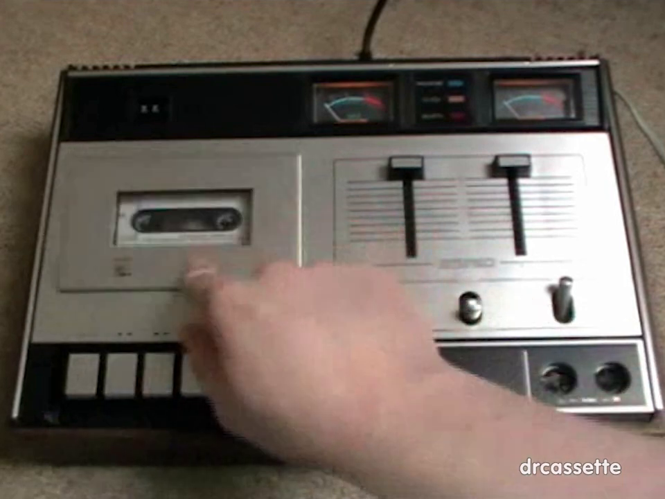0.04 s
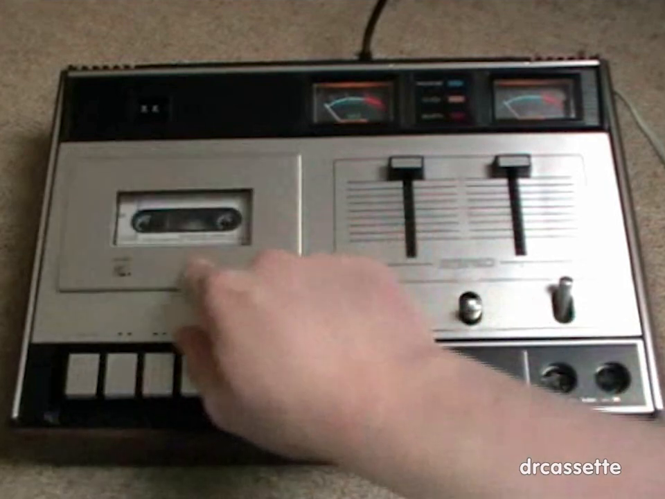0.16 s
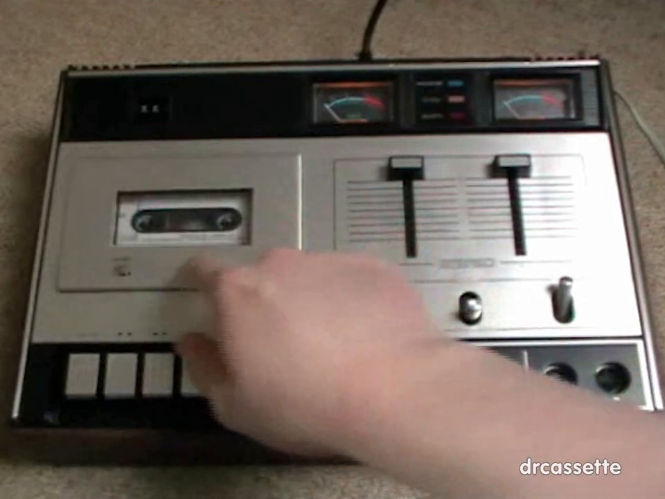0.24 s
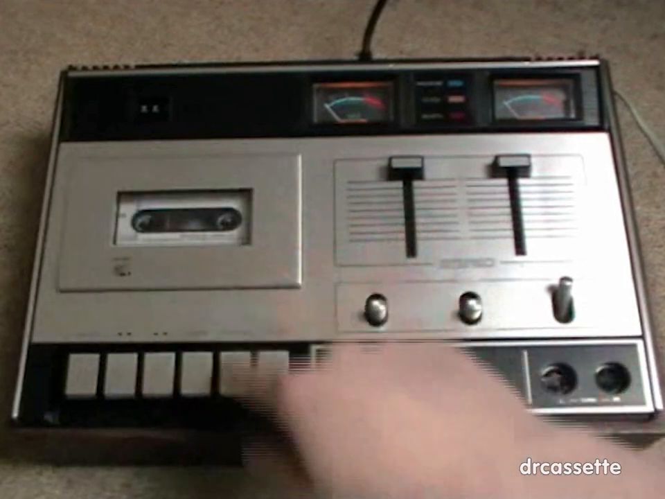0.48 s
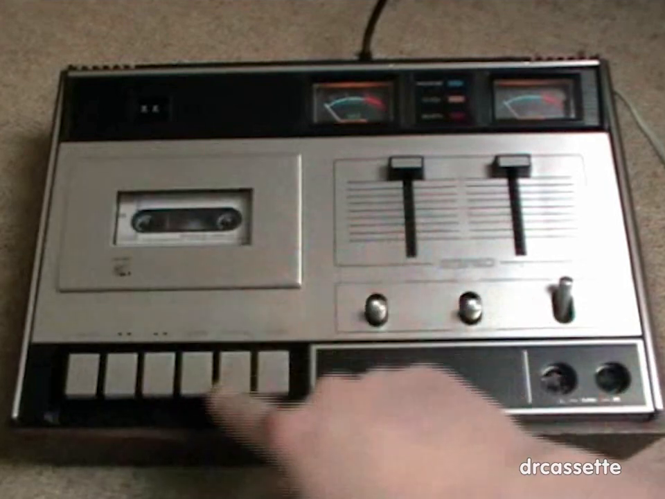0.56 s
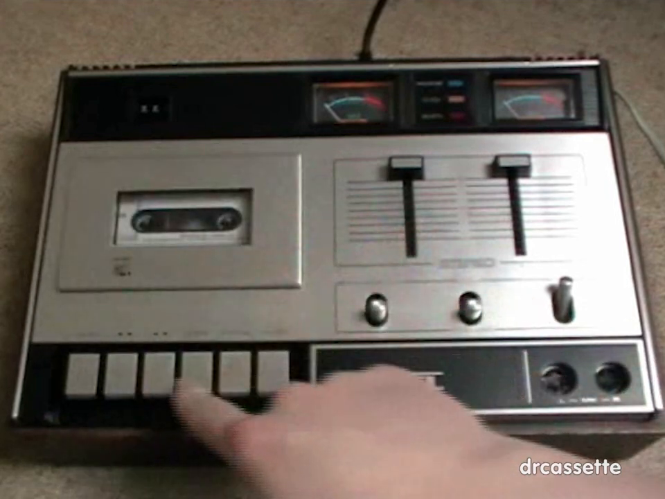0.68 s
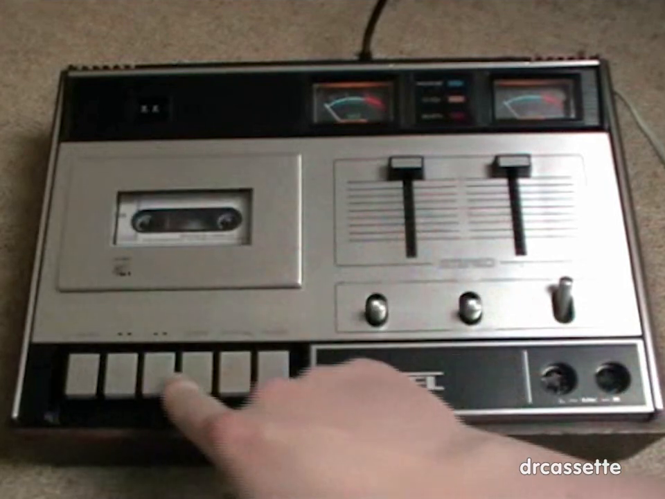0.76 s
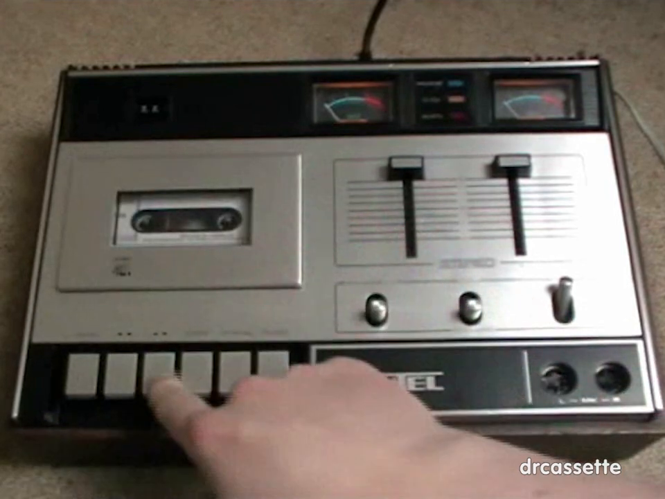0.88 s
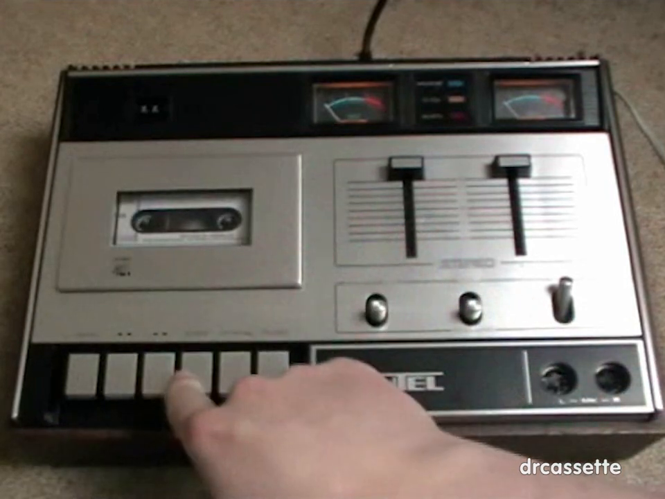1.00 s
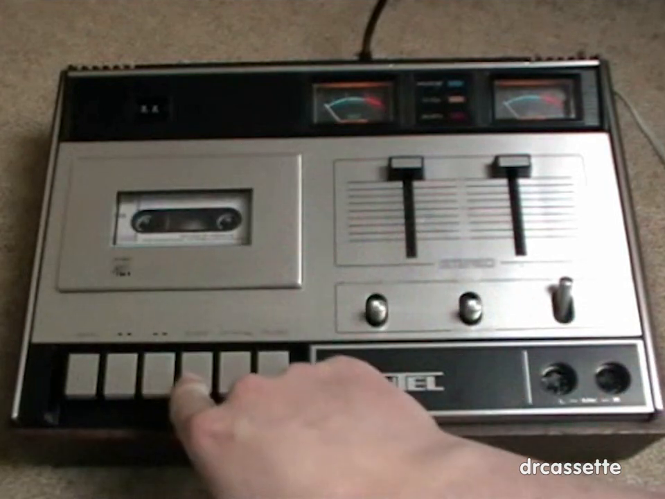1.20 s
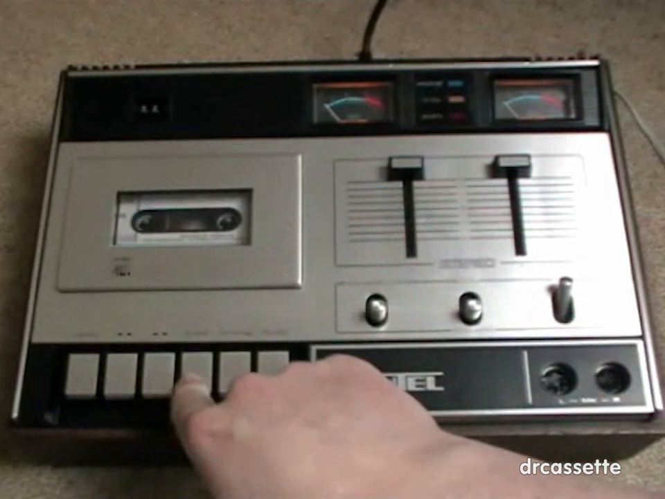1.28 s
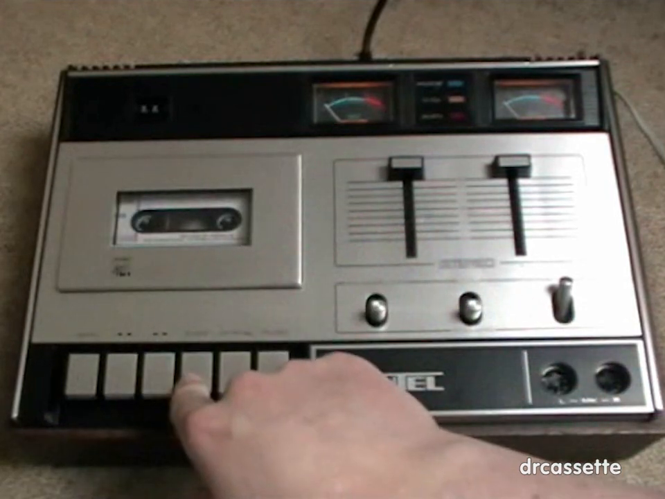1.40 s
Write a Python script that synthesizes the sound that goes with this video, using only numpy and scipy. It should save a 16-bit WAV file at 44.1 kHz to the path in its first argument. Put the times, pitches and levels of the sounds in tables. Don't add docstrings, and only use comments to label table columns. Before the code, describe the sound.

A cassette deck's plastic lid snaps closed in a quick clattering burst, over faint motor buzz

```python
import sys
import numpy as np
from scipy import signal
from scipy.fft import rfft, irfft, next_fast_len
from scipy.io import wavfile
from scipy.ndimage import map_coordinates

SR = 44100
rng = np.random.default_rng(int(sys.argv[2]) if len(sys.argv) > 2 else 0)


def level_to_linear(level):
    exponent = np.asarray(level, float) / 20
    return 10 ** exponent


def wrap_up_sound(samples):
    columns = np.atleast_2d(samples).T
    tamed = np.clip(columns, -1, 1)
    steps = np.round(tamed * 32767).astype(np.int16)
    wavfile.write(sys.argv[1], SR, steps)


N = 63945
LOW_CUT_HZ = 150


def unit(x):
    return x / np.sqrt(np.mean(x ** 2) + 1e-20)


def along(points, hz):
    f, value = np.transpose(points)
    return np.interp(np.log(hz + 1), np.log(f + 1), value)


def envelope(rows):
    s, db = np.transpose(rows)
    return level_to_linear(np.interp(np.arange(N) / SR, s, db, left=-200, right=-200))


def wobble(rate):
    knots = rng.standard_normal(int(N * rate / SR) + 4)
    return map_coordinates(knots, [np.arange(N) * rate / SR])


def filtered(x, response):
    m = next_fast_len(N + SR // 2)
    return irfft(rfft(x, m) * response(np.fft.rfftfreq(m, 1 / SR)), m)[..., :N]


def high_pass(x, hz, order=2):
    return filtered(x, lambda f: (1j * f / (hz + 1j * f)) ** order)


def ring(modes, attack_s, scatter_db=0, detune=0):
    t = np.arange(SR // 2) / SR
    chance = rng.standard_normal((len(modes), 2))
    out = np.zeros(len(t))
    for (hz, db, t60), (louder, sharper) in zip(modes, chance):
        decay = level_to_linear(db + scatter_db * louder - 60 * t / t60)
        out += decay * np.sin(2 * np.pi * hz * (1 + detune * sharper) * t)
    return (1 - np.exp(-t / attack_s)) * out


def add(track, s, x):
    part = track[round(s * SR):][:len(x)]
    part += x[:len(part)]


# frequency in Hz, width in Hz, level in dB, lag in seconds.
MOTOR = [(820, 120, -5, .002), (950, 50, 1, 0), (1180, 150, -7, .003), (1650, 200, -13, .008),
         (2090, 120, 0, 0), (2780, 100, -11, .006), (3330, 110, -8, .012), (3710, 160, -4, .015),
         (4150, 100, -10, .009)]
# multiple of the mains frequency, level in dB.
HUM = [(2, -73.5), (3, -78.5), (5, -76.5)]
# frequency in Hz, density in dB per Hz.
HISS = [(25, -29.5), (150, -6.5), (370, -12.5), (900, -13.5), (2400, -20), (4500, -17.5), (11000, -27.5),
        (13000, -31.5)]


def camera():
    t = np.arange(N) / SR
    mains_hz, buzz_start_s, pulse_count = 50, .0155, 80
    times = buzz_start_s + np.arange(pulse_count) / mains_hz
    strengths = level_to_linear(.5 * rng.standard_normal(pulse_count))
    pulses = np.bincount(np.round(times * SR).astype(int), strengths)[:N]

    def motor_body(f):
        total = 0
        for centre, width, db, lag in MOTOR:
            resonance = 1j * f * width / (centre * centre - f * f + 1j * f * width)
            total = total + level_to_linear(db) * resonance ** 2 * np.exp(-2j * np.pi * f * lag)
        return total

    buzz = level_to_linear(-67.5) * unit(filtered(pulses, motor_body))
    hum = np.zeros(N)
    for multiple, db in HUM:
        hum += level_to_linear(db + 4 + 1.2 * wobble(8)) * np.cos(2 * np.pi * multiple * mains_hz * (t - buzz_start_s))
    drone_hz, drone_db = 193, -67
    drone = level_to_linear(drone_db + 3 * wobble(12)) * np.sin(2 * np.pi * drone_hz * t + .74 * wobble(4.3))
    mid, side = filtered(rng.standard_normal((2, N)), lambda hz: level_to_linear(along(HISS, hz)))
    side = level_to_linear(3) * side
    hiss = level_to_linear(-60 + .3 * wobble(18)) * unit(np.array([mid + side, mid - side]))
    return buzz + hum + drone + hiss


def jolt():
    out = np.zeros(N)
    hz = 45
    add(out, .247, level_to_linear(-54.5) * ring([(hz, 0, .1), (hz / 2, 0, .2)], .003))
    return out * level_to_linear([[2], [-2]])


# frequency in Hz, t60 in seconds.
ROOM = [(150, 0.16), (500, .35), (1500, 0.37), (4000, 0.32), (10000, 0.25)]


def room(x):
    delay_s, likeness = .004, .55
    hz, t, z = signal.stft(rng.standard_normal((2, SR // 2)), SR, nperseg=256)
    fading = z * level_to_linear(-60 * t / along(ROOM, hz)[:, None])
    a, b = signal.istft(fading, SR, nperseg=256)[1]
    turn = np.arccos(likeness) / 2
    common, apart = np.cos(turn) * a, np.sin(turn) * b
    tail = np.array([common + apart, common - apart]) / np.linalg.norm(a)
    late = np.pad(x, (round(delay_s * SR), 0))
    return signal.fftconvolve(late[None], tail, axes=1)[:, :N]


def near(x):
    t = np.arange(SR // 10) / SR
    t60 = .05
    tail = rng.standard_normal(len(t)) * level_to_linear(-60 * t / t60)
    return level_to_linear(-12) * signal.fftconvolve(x, tail / np.linalg.norm(tail))[:N]


# time in seconds, level in dB.
BRUSH = [(.42, -87), (.5, -61), (.58, -68), (.65, -60), (.73, -66.5), (.85, -71.5), (.97, -88)]
# frequency in Hz, level in dB.
CLOTH = [(100, -46), (300, -12), (560, -1), (1000, -25), (1700, -7), (2400, -27), (8000, -46), (12000, -49)]


def sleeve():
    cloth = filtered(rng.standard_normal(N), lambda hz: level_to_linear(along(CLOTH, hz)))
    return envelope(BRUSH) * level_to_linear(2.613 * wobble(30)) * unit(cloth)


# frequency in Hz, level in dB.
PANELS = [(170, -12), (275, -2.5), (330, -3.5), (384, -2.5), (445, -10.5)]
# time in seconds, level in dB.
BOOM = [(.283, -51), (.295, -34), (.36, -33.5), (.38, -41), (.42, -48.5), (.45, -59), (.5, -54.5)]


def boom():
    t = np.arange(N) / SR
    out = np.zeros(N)
    for hz, db in PANELS:
        out += level_to_linear(db + 4 * wobble(35)) * np.sin(2 * np.pi * hz * t + wobble(30))
    return envelope(BOOM) * out


# time in seconds, level in dB.
TAPS = [(.1310, -48), (.1345, -45), (.2165, -58), (.4572, -48), (.4600, -46), (.4637, -44), (.4662, -38),
        (.4705, -45), (1.4175, -55)]
# frequency in Hz, level in dB, t60 in seconds.
LID = [(400, -2, .02), (560, -2, .025), (700, -1, .022), (890, -3, .02), (1150, -5, .018), (1420, -6, .018),
       (1900, -9, .015), (2500, -14, .012)]


def finger():
    out = np.zeros(N)
    for s, db in TAPS:
        add(out, s, level_to_linear(db) * ring(LID, .0008, 3, .04))
    bounce_hz, bounce_t60 = 231, .082
    add(out, .4662, level_to_linear(-25) * ring([(bounce_hz, 0, bounce_t60)], .0034))
    return high_pass(out, LOW_CUT_HZ)


# time in seconds, level in dB.
RATTLE = [(.244, -41), (.25, -21), (.262, -24), (.28, -12.5), (.292, -35), (.31, -37.5), (.34, -49)]
# frequency in Hz, level in dB, t60 in seconds.
SHELL = [(1080, -7, .015), (1740, -8, .012), (2200, -4, .022), (2765, -3, .02), (3100, -4, .012),
         (3650, -6, .008), (4450, -5, .008), (4900, -8, .006), (5690, -8, .006), (6500, -9, .005),
         (7300, -9, .005), (8200, -9, .005), (9100, -9, .005)]


def rattle():
    rate_hz = 1500
    chance, direction = rng.random((2, N))
    knocks = (chance < rate_hz / SR) * np.sign(direction - .5)
    body = ring([(hz, db, t60 / 2) for hz, db, t60 in SHELL], .0001)
    body[:3] = 9, 4, -4
    rattling = signal.fftconvolve(envelope(RATTLE) * unit(knocks), body / np.linalg.norm(body))[:N]
    return high_pass(rattling, 400)


# frequency in Hz, level in dB, t60 in seconds.
SPRING = [(1380, 0, .03), (1270, -7, .02), (1520, -4, .022)]
# time in seconds, level in dB.
CREAK = [(.138, -75), (.15, -58.5), (.166, -54.5), (.174, -60), (.184, -43.5), (.2, -51), (.214, -66.5),
         (.222, -51), (.24, -62.5)]
# start in seconds, then spring twang, plastic click and cabinet thud, all in dB.
CONTACTS = [(0.1266, -30, -73, -76), (.1300, -38.5, -71, -72), (.1335, -50, -47.5, -60.5),
            (0.2156, -60, -53, -70), (.2415, -37, -59, -72.5), (0.2446, -2.5, -21.5, -53),
            (0.2481, -17, -8, -44.5), (0.2496, -1.5, -18, -48), (0.2524, -11, -2.5, -43.5),
            (0.2556, -3.5, -12.5, -48.5), (0.2626, -19.5, -18, -47), (.2697, -8, -13.5, -41),
            (0.2771, -18.5, -7.5, -33), (0.2808, -32, -8, -7), (0.285, -26, -8, -17),
            (0.2889, -33.5, -19.5, -40)]


def spring():
    slips = rng.standard_normal(N) * level_to_linear(3 * wobble(250))
    out = envelope(CREAK) * unit(signal.fftconvolve(slips, ring(SPRING, .0015))[:N])
    for s, spring_db, *_ in CONTACTS:
        overtone = ring([(2784, -2.5 + spring_db, .015)], .0011)
        add(out, s, level_to_linear(spring_db) * (ring(SPRING, .0012, 1) + overtone))
    return out


# frequency in Hz, level in dB, t60 in seconds.
CABINET = [(217, -3, 0.049), (282, 2.5, .045), (323, -3, 0.012), (546, -4, 0.03), (691, -2.5, 0.02998),
           (860, -9, .03), (1190, -9.5, 0.042)]


def lid():
    out, cracks = np.zeros(N), np.zeros(N)
    t = np.arange(SR // 2) / SR
    crack_t60, dull_hz = .015, 7000
    for s, _, click_db, thud_db in CONTACTS:
        add(cracks, s, level_to_linear(click_db + 5.5 - 60 * t / crack_t60) * rng.standard_normal(len(t)))
        thud = level_to_linear(thud_db) * ring(CABINET, .0008, 3.6)
        click = level_to_linear(click_db - 8) * ring(SHELL, .0001, 2, .04)
        add(out, s, thud + click)
    dulled = filtered(cracks, lambda hz: 1 / (1 + 1j * hz / dull_hz))
    return high_pass(out + dulled, LOW_CUT_HZ, order=6)


# frequency in Hz, side over mid as a ratio.
PAN = [(60, .3), (250, -.06), (600, .12), (1300, .1), (3000, .02)]


def scene():
    twang = spring()
    hard = filtered(lid() + rattle(), lambda hz: 1 / (1 + (hz / 11000) ** 8))
    plastic = hard + sleeve() + finger()
    deck = twang + plastic + boom()
    scatter = high_pass(near(plastic + .6 * twang), 350)
    side = filtered(deck, lambda hz: along(PAN, hz)) + scatter
    echo = level_to_linear(-9.5) * high_pass(room(plastic + level_to_linear(-12) * twang), 200)
    return np.array([deck + side, deck - side]) + echo + jolt() + camera()


def band_limit(x):
    return signal.sosfilt(signal.butter(12, 13170, fs=SR, output="sos"), x)


def record(dry):
    limit, top_hz, stereo_top_hz = .8, 12150, 3900
    dry = dry / (1 + np.abs(dry / limit) ** 3) ** (1 / 3)
    mid = filtered((dry[0] + dry[1]) / 2, lambda hz: 1 / (1 + (hz / top_hz) ** 40))
    side = filtered((dry[0] - dry[1]) / 2, lambda hz: 1 / (1 + (hz / stereo_top_hz) ** 80))
    mix = np.array([mid + side, mid - side])
    return band_limit(mix)


dry = scene()
out = record(dry)
wrap_up_sound(out)
```